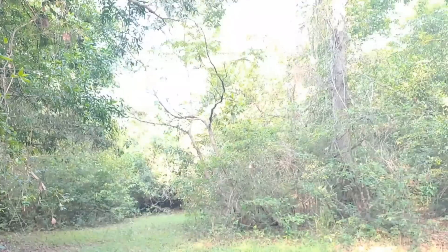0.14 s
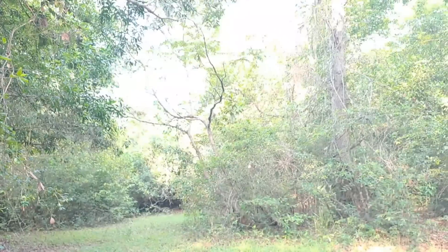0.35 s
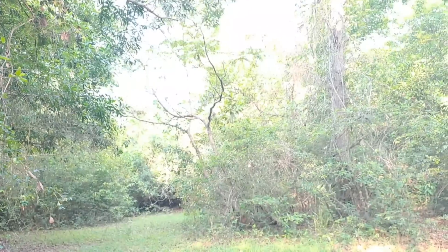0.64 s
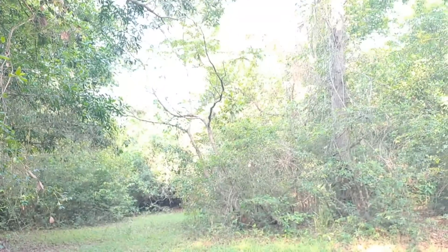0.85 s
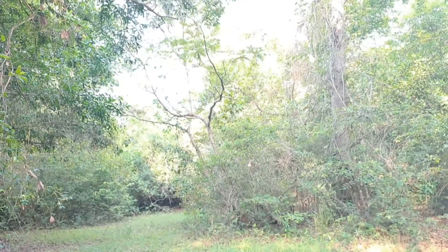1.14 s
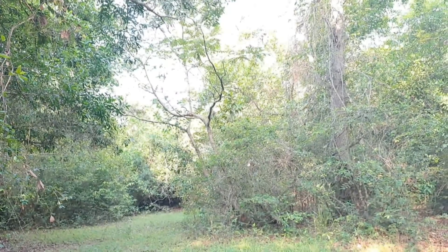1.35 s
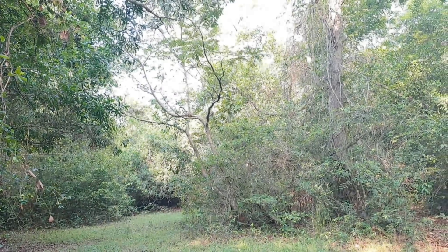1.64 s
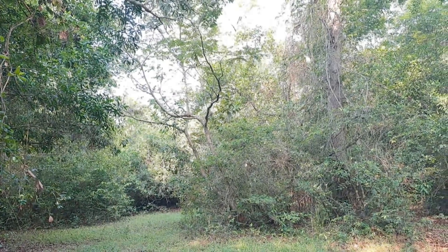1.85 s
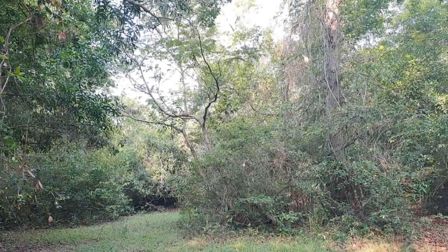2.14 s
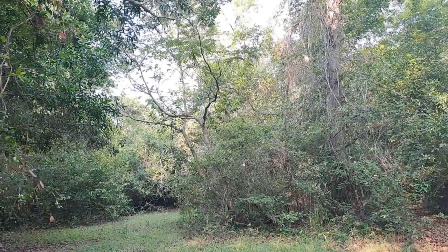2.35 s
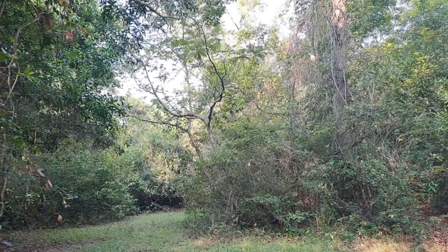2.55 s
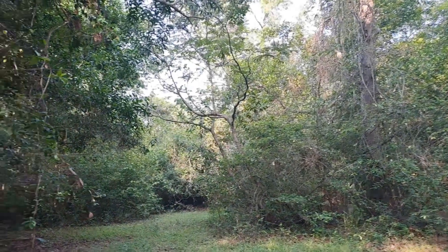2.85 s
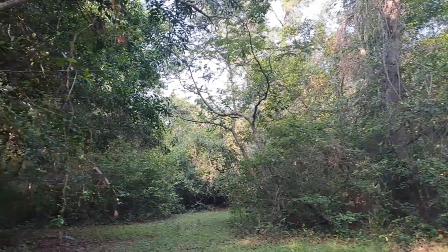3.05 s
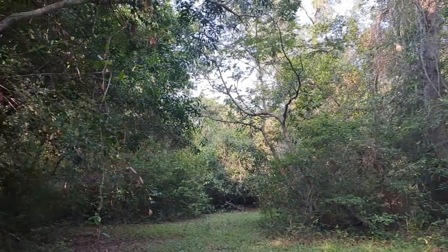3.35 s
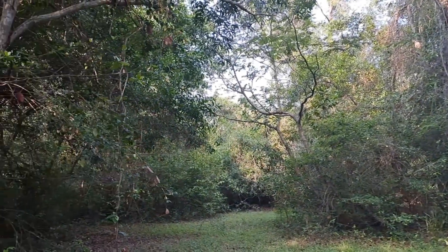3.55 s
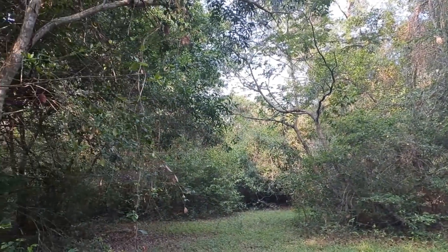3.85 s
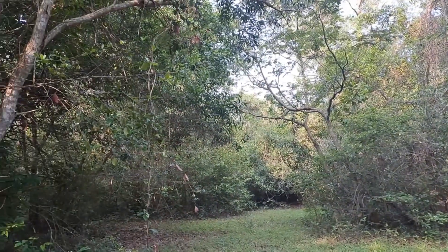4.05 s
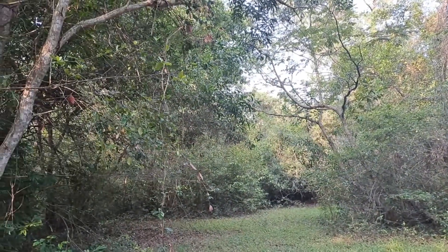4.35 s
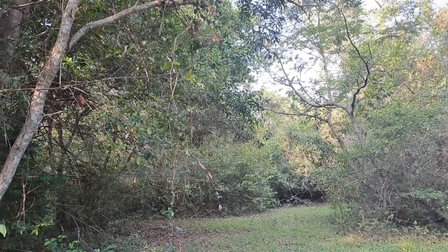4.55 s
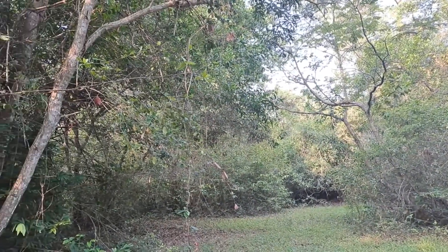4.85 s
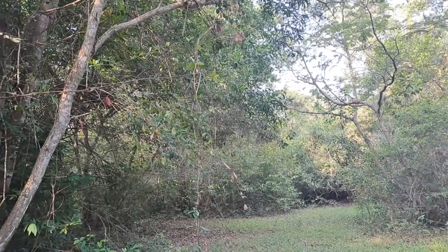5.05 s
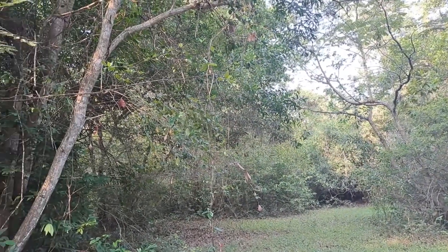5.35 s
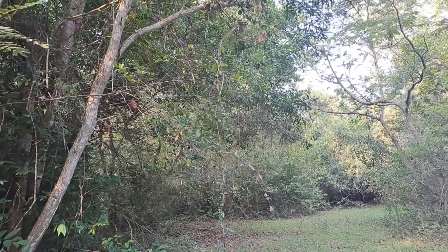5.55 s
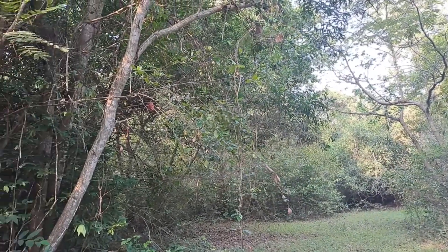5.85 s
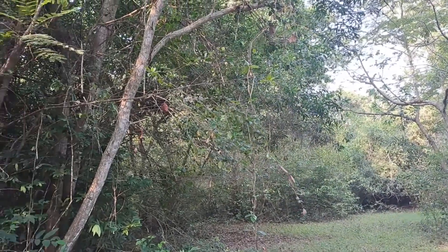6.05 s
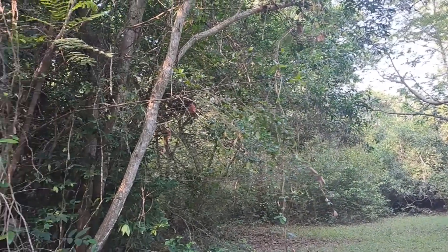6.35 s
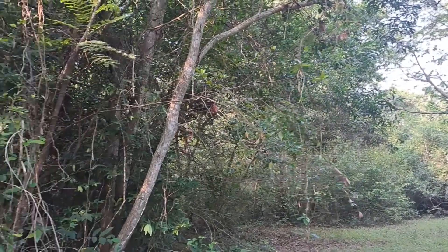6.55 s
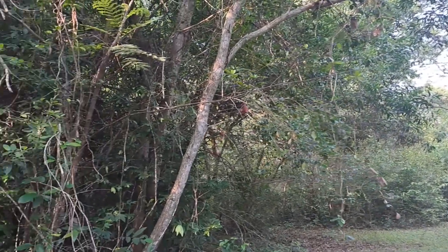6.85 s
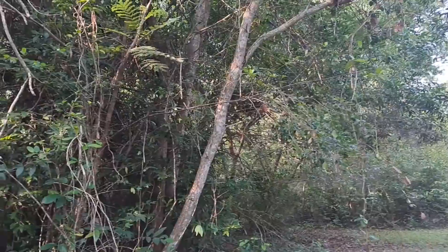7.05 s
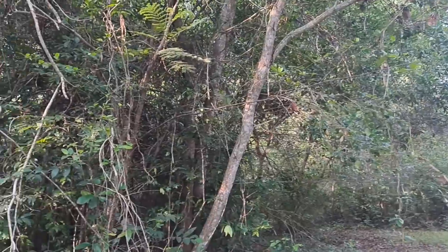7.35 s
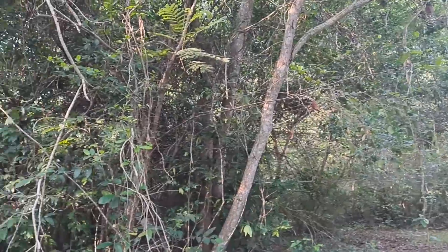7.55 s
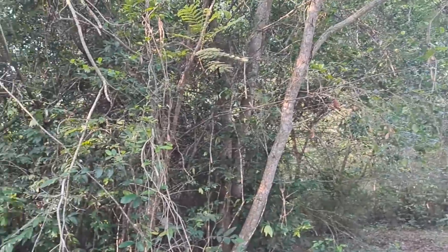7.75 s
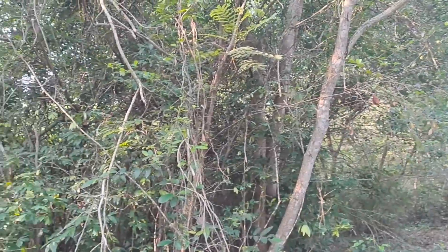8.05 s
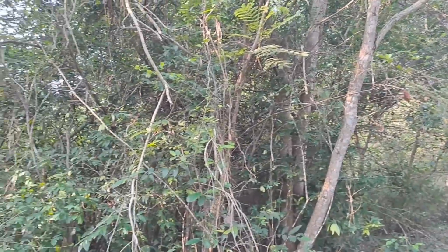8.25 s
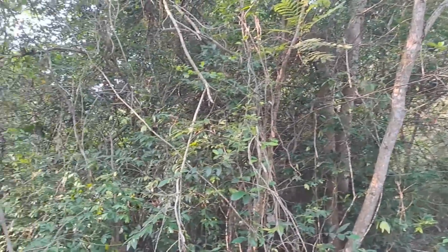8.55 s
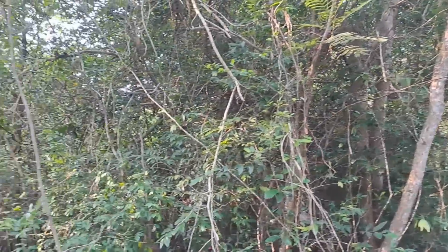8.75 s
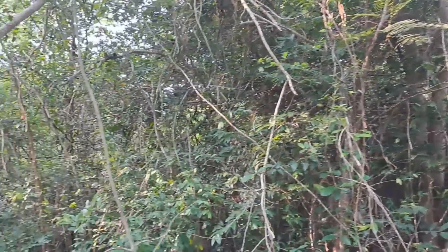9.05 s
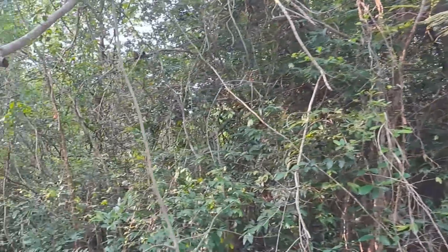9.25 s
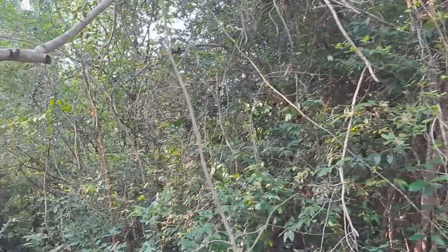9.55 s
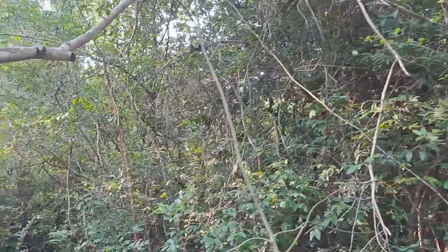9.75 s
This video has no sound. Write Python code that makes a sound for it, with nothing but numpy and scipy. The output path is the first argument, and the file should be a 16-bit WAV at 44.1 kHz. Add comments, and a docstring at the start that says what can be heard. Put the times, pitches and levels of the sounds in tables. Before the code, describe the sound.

A wren sings in bunches over a thin insect drone, with small birds chipping, a crow cawing and footsteps rustling through dry leaves.

```python
"""A wren sings a rolling phrase in bunches at a forest edge; a crow caws further off.
Small birds chip, twitter and whistle; crickets and katydids drone over a low distant rumble.
Someone turns on the spot, rustles and steps on dry leaves.
Trunks and foliage scatter every call before it reaches two microphone ports a hand apart."""
import sys
import numpy as np
from scipy import signal
from scipy.fft import rfft, irfft, next_fast_len
from scipy.io import wavfile
from scipy.ndimage import uniform_filter1d

SR = 44100
rng = np.random.default_rng(int(sys.argv[2]) if len(sys.argv) > 2 else 0)


def master_out(mix):
    """Clip the mix to full scale and print it as 16-bit PCM to the path in sys.argv[1]."""
    frames = np.transpose(np.atleast_2d(mix))
    ceiling = np.clip(frames, -1, 1)
    pcm = np.round(ceiling * 32767).astype(np.int16)
    wavfile.write(sys.argv[1], SR, pcm)


N = 436149
TIME = np.arange(N) / SR

# far chip, its sweep evened out by scatter: (time [s], pitch [ratio], level [dB])
FAR_CHIP_SWEEP = [(0, 1.09, -5), (.008, 1.02, 0), (.016, .97, 0), (.024, .92, -4)]


def undb(db):
    """Decibels to gain."""
    return 10 ** (np.asarray(db) / 20)


def unit(x):
    """Scale to rms 1."""
    return x / np.sqrt(np.mean(x ** 2))


def curve(rows, t=TIME):
    """Interpolate each further column along the first."""
    times, *columns = np.transpose(rows)
    return [np.interp(t, times, column) for column in columns]


def shape(x, gain):
    """Filter by gain(frequency in Hz)."""
    size = next_fast_len(N + 4096)
    hz = np.arange(size // 2 + 1) * SR / size + 1e-3
    return irfft(rfft(x, size) * gain(hz), size)[..., :N]


def colour(x, points):
    """Filter by (frequency [Hz], gain [dB]) points."""
    hz, db = np.transpose(points)
    return shape(x, lambda f: undb(np.interp(np.log(f), np.log(hz), db)))


def resonance(f, hz, width_hz):
    """Gain of a resonance passed twice."""
    return 1 / (1 + ((f * f - hz * hz) / (f * width_hz * 1.55)) ** 2)


def drift(rate_hz):
    """Smooth random signal, spread near 1."""
    knots = rng.standard_normal(int(N / SR * rate_hz) + 3)
    return 1.2 * np.interp(TIME * rate_hz, np.arange(len(knots)), knots)


def add(track, start_s, sound):
    """Mix a sound into a track, cropped at both ends."""
    start = int(start_s * SR)
    part = sound[max(-start, 0):max(N - start, 0)]
    track[max(start, 0):max(start, 0) + len(part)] += part


def swells(rows):
    """Envelope of smooth humps: (middle [s], length [s], level [dB])."""
    envelope = np.zeros(N)
    for middle_s, length_s, db in rows:
        add(envelope, middle_s - length_s / 2, undb(db) * signal.windows.hann(int(length_s * SR)))
    return envelope


def blows(rows):
    """Envelope of sudden contacts: (time [s], level [dB], decay [s])."""
    envelope, t = np.zeros(N), TIME[:SR // 2]
    for start_s, db, decay_s in rows:
        add(envelope, start_s, undb(db) * np.exp(-t / decay_s))
    return envelope


def ports(x, lag_ms, pan_db):
    """Two ports: the left is later by lag_ms and louder by pan_db."""
    late = shape(x, lambda f: np.exp(-2j * np.pi * f * lag_ms / 1000))
    return np.array([undb(pan_db / 2) * late, undb(-pan_db / 2) * x])


def forest(x, near_db, near_t60_s, far_db, far_t60_s):
    """Scatter off nearby trunks plus a wash from the depth of the wood."""
    t = TIME[:SR]
    response = 0
    for db, t60_s in ((near_db, near_t60_s), (far_db, far_t60_s)):
        echoes = rng.standard_normal((2, SR)) * (1 + 6 * (rng.random((2, SR)) < .01))
        echoes *= undb(-60 * t / t60_s) * (1 - np.exp(-t / .0021))
        response += undb(db) * echoes / np.linalg.norm(echoes, axis=1, keepdims=True)
    return signal.fftconvolve(x[None], response, axes=1)[:, :N]


def note(rows, waver=0):
    """Pure whistle along (time [s], pitch [Hz], level [dB]) points, never twice quite alike."""
    times, hz, db = np.transpose(rows)
    times = np.sort(times)
    t = np.arange(times[0], times[-1] + .001, 1 / SR)
    chance = rng.standard_normal(64)
    tremble = 1 + waver * np.interp(t - t[0], np.arange(64) / 120, chance)
    glide_hz = uniform_filter1d(np.interp(t, times, hz), 100) * tremble * (1 + .00715 * chance[0])
    envelope = undb(np.interp(t, times, db) + 1.2 * chance[1]) * signal.windows.tukey(len(t), .15)
    return np.sin(2 * np.pi * np.cumsum(glide_hz) / SR) * envelope


def wren():
    """A falling note, two arches and an upsweep; the direct path fades as the microphone turns away."""
    # phrases: (time [s], level [dB], direct path gain [dB])
    phrases = [(-.14, -23, 7.5), (0.1056, -24.5, 4.5), (.381, -24, 4.5), (.684, -24, 4.5),
               (1.6506, -24, 2.5), (1.925, -23.5, 2.5), (2.2088, -23.5, 3), (3.305, -25, 2.5),
               (3.5827, -24, 1.5), (3.8753, -25, 3), (5.7375, -25.5, -6), (6.009, -23, -3.5)]
    # four notes, each a list of (time in phrase [s], pitch [Hz], level [dB])
    notes = [
        [(-.002, 3650, -14.5), (.003, 3454, -1.5), (.008, 2890, -1), (.014, 2580, -25)],
        [(.04, 2183, -18.5), (.046, 2930, 0), (.052, 3185, -3), (.058, 2840, -10.5)],
        [(.083, 2067, -18), (.089, 2944, -1.5), (.095, 3274, 0), (.1, 2930, -21)],
        [(.125, 2022, -21), (.131, 2990, -3.5), (.141, 3570, -2.5), (.151, 3925, -2), (.161, 4073, 1),
         (.17, 4155, -11)],
    ]
    # soft lone calls on the falling note: (time [s], level [dB])
    lone_calls = [(7.304, -38), (7.578, -37.5)]
    # single echoes off trunks and the tree line: (delay [s], level [dB], left port lag [ms])
    trunks = [(.021, -18, -0.35), (.036, -13, 0.32), (.092, -18, -0.039)]
    song, direct = np.zeros((2, N))
    for start_s, db, direct_db in phrases:
        for rows in notes:
            onset_s = start_s + rows[0][0]
            sung = undb(db) * note(rows, waver=.0065)
            add(song, onset_s, sung)
            add(direct, onset_s, undb(direct_db) * sung)
    for start_s, db in lone_calls:
        call = undb(db) * note(notes[0])
        add(song, start_s, call)
        add(direct, start_s, call)
    # foliage shades some pitches and scatters them instead
    direct = colour(direct, [(2200, -1.5), (2800, -2.5), (3250, 3), (3700, -5), (4200, 1)])
    scattered = colour(song, [(2300, 2.7), (3000, -1.1), (3400, .52), (4100, .25)])
    echoes = forest(scattered, near_db=-.5, near_t60_s=.37, far_db=.5, far_t60_s=.66)
    for delay_s, db, lag_ms in trunks:
        delayed = np.pad(scattered, (int(delay_s * SR), 0))[:N]
        echoes += undb(db) * ports(delayed, lag_ms, pan_db=-15)
    return ports(direct, lag_ms=.38, pan_db=-1.5) + echoes


def crow():
    """Long harsh caws: uneven pulses of the syrinx through two throat resonances."""
    # caws: (start [s], length [s], level [dB], top pitch [Hz], added roughness [0-1])
    calls = [(-.44, .65, -28, 301.4, 0.18), (0.677, 0.67, -27.5, 289.4, 0.07),
             (8.783, .57, -37, 284.8, 0.22)]
    # double arch of a caw: (progress [0-1], pitch [ratio], level [dB], roughness [0-1])
    arches = [(0, .85, -11.5, .5), (.15, 0.94, -2.5, 0.42), (.26, 1, 2, 0.2), (.42, .93, -3, 0.27),
              (.64, .865, -2, 0.31), (.72, 1, -4, 0.48), (.92, .84, -6.5, 0.55), (1, .8, -16, 0.62)]
    # throat resonances: (centre [Hz], width [Hz], gain [dB])
    throat = [(1665, 326, 7), (2120, 135, 15)]
    contour, effort = [], np.zeros(N)
    for start_s, length_s, db, top_hz, added_rough in calls:
        for progress, ratio, _, rough in arches:
            contour.append((start_s + progress * length_s, top_hz * ratio, rough + added_rough))
        _, arch_db, _ = curve(arches, np.linspace(0, 1, int(length_s * SR)))
        add(effort, start_s, undb(db + arch_db))
    pitch_hz, rough = curve(contour)
    phase = 2 * np.pi * np.cumsum(pitch_hz * (1 + .0275 * rough * drift(220))) / SR
    pulses = sum(np.cos(k * phase) for k in range(3, 10)) * undb(5.8 * rough * drift(180))
    rasp = 3 * rough * (1 + np.cos(phase)) * rng.standard_normal(N)
    voice = shape(pulses + rasp,
                  lambda f: sum(undb(db) * resonance(f, hz, width_hz) for hz, width_hz, db in throat))
    timbre = [(500, -6), (850, 13.5), (1150, 8), (1450, 10.5), (2200, 0), (2600, 5), (4000, -28)]
    caws = unit(colour(voice, timbre)) * uniform_filter1d(effort, 900)
    wash = forest(caws, near_db=-2, near_t60_s=.74, far_db=-9, far_t60_s=.25)
    return ports(caws, lag_ms=.21, pan_db=0) + wash


def cricket(pitch_hz, stroke_hz, depth):
    """Wing tone pulsed by each stroke; paths through the grass shift its phase at each port."""
    strokes = 1 + depth * np.cos(2 * np.pi * np.cumsum(stroke_hz * (1 + .009 * drift(2.84))) / SR)
    phase = 2 * np.pi * np.cumsum(pitch_hz) / SR
    tone = np.array([np.sin(phase + 1.5 * drift(3) + .5 * drift(110)) for port in range(2)])
    return unit(tone * strokes) * undb([[1.4], [-1.4]])


def katydid(first_s=.17, period_s=.775, buzz_s=.76):
    """A high, narrow buzz repeated at an even pace."""
    envelope = np.zeros(N)
    for start_s in np.arange(first_s, N / SR, period_s):
        add(envelope, start_s, np.sqrt(signal.windows.hann(int(buzz_s * SR))))
    band = shape(rng.standard_normal((2, N)), lambda f: resonance(f, hz=11380, width_hz=370))
    return unit(band) * envelope * undb(-48.5)


def insects(trill_s=6.55):
    """Near crickets and a katydid; countless far insects merge into a hiss."""
    # near crickets: (pitch [Hz], wander [Hz], stroke rate [Hz], stroke depth [0-1], level [dB])
    crickets = [(8140, 12, 53, 1, -45), (8157, 25, 36, 0.4, -47), (7600, 17, 36, 0.58, -48),
                (8020, 16, 46, 1, -43), (8040, 94, 23, 0.3, -72), (7000, 100, 37, 0.8, -51),
                (8610, 7.3, 36, 1, -58.5)]
    # far chorus: (frequency [Hz], level [dB])
    chorus_spectrum = [(1000, -22), (2500, -7.5), (3500, -16.5), (4800, -2.5), (5400, -1.5), (6100, 3.5),
                       (6800, 8.5), (7700, 22.5), (8300, -12.5), (8850, -70), (9700, -13), (10600, 8.5),
                       (12000, -22), (16000, 0)]
    near = sum(cricket(hz + wander_hz * drift(1.5), stroke_hz, depth) * undb(db + 1.06 * drift(1.23))
               for hz, wander_hz, stroke_hz, depth, db in crickets)
    # one cricket trills once, its pitch rising as it warms up
    trill = cricket(7150 + 200 * (TIME - trill_s), stroke_hz=44, depth=.97)
    trill *= swells([(trill_s, .55, -41.5)])
    far_crickets = shape(rng.standard_normal((2, N)), lambda f: resonance(f, hz=8265, width_hz=147))
    buzz = katydid()
    chorus = unit(colour(rng.standard_normal((2, N)), chorus_spectrum)) * undb(-42 + .82 * drift(3.3))
    return near + trill + unit(far_crickets) * undb(-42) + buzz + chorus


def rumble():
    """Far traffic: long waves reach both ports alike, shorter ones apart."""
    # rumble and the hush of the wood: (frequency [Hz], level [dB])
    spectrum = [(20, -30), (32, -32), (43, -2), (55, 3.5), (68, -1.5), (90, -1), (130, -8.5), (185, -15),
                (250, -25.5), (400, -35.5), (700, -43.5), (1500, -51), (3000, -50.5)]
    # stereo width: (frequency [Hz], side to mid [dB])
    width = [(30, -34), (70, -15.5), (130, -15.5), (260, -7.5), (500, -5.5), (1000, 5), (2000, -2)]
    mid, side = colour(rng.standard_normal((2, N)), spectrum)
    side = colour(side, width)
    return unit(np.array([mid + side, mid - side])) * undb(-29.5)


def crackle(spread_db):
    """Dense tiny fractures of uneven size, different at each port."""
    sizes = undb(spread_db * rng.exponential(size=N // 48 + 1).clip(0, 4.5))
    return rng.standard_normal((2, N)) * np.repeat(sizes, 48)[:N]


def walker():
    """Clothes rustle, leaves crush and snap underfoot, dull scuffs arrive from the left."""
    # brushes of clothes and leaves; leaves under a shoe: (middle [s], length [s], level [dB])
    brushes = [(.02, 0.29, -39.5), (.95, 1, -44.5), (1.24, 0.14, -38), (1.63, 0.34, -36), (2.46, 0.27, -40),
               (3.12, 0.24, -50), (3.38, 0.37, -46), (3.59, 0.21, -36.5), (4.49, 0.33, -35),
               (5.11, 0.38, -43), (5.35, 0.24, -40), (6.08, 0.46, -45), (7.04, 0.23, -39.5),
               (7.38, 0.35, -49), (8.2, 0.5, -33.5), (8.48, 0.32, -31.5), (8.74, 0.38, -38),
               (9.05, 0.71, -45), (9.6, 0.73, -43), (9.8, 0.36, -33.5)]
    treads = [(8.18, 0.47, -31.5), (8.49, 0.44, -40.5), (8.8, 0.11, -44)]
    # twig and leaf snaps; close scuffs and knocks: (time [s], level [dB], decay [s])
    breaks = [(1.235, -46, .015), (2.079, -30, 0.011), (6.252, -36, 0.0074), (7.299, -37.5, 0.013),
              (8.049, -27, 0.0025), (8.119, -26, 0.0033), (8.478, -23.5, 0.053), (8.496, -14.5, 0.0022),
              (8.636, -25, 0.0022), (8.7395, -24.5, 0.0021), (8.999, -27, 0.0029), (9.632, -32, 0.026),
              (9.733, -17.5, 0.0046), (9.823, -27, 0.017)]
    knocks = [(1.62, -48, 0.071), (2.42, -50, .045), (3.33, -44.5, 0.034), (4.87, -40.5, 0.017),
              (5.33, -46, .064), (6.17, -46.5, 0.07), (6.23, -39, 0.04), (7.37, -50, 0.19),
              (8.472, -26, 0.0045), (9.632, -32, 0.036), (9.725, -34, 0.046), (9.775, -35, 0.036)]
    # spectra: (frequency [Hz], level [dB])
    rustle_spectrum = [(300, 6), (1000, -2.5), (2200, 0.5), (4000, 8), (6500, 11.5), (9500, 3.5),
                       (12500, 8), (16000, -2.5)]
    crush_spectrum = [(200, -1), (500, -1.5), (1100, 8.5), (2200, 2.5), (5500, -11), (9000, -4), (16000, 3)]
    snap_spectrum = [(200, 11), (700, 6), (1200, -12.5), (2500, 6), (5500, 0.5), (9000, 4), (12000, 11.5),
                     (16000, 3)]
    scuff_spectrum = [(120, -15), (250, 1), (480, 3), (720, 7.5), (1100, -5), (2000, -21), (5000, -47)]
    rustle = unit(colour(crackle(spread_db=2.5), rustle_spectrum)) * undb([[.8], [-.8]])
    faint_stir = undb(-49 + 2 * drift(6))
    rustle *= swells(brushes) + faint_stir
    crush = unit(colour(crackle(spread_db=2.5), crush_spectrum)) * swells(treads)
    snaps = unit(colour(crackle(spread_db=-2.5), snap_spectrum)) * blows(breaks)
    scuffs = unit(colour(crackle(spread_db=3)[0], scuff_spectrum)) * blows(knocks)
    return rustle + crush + snaps + ports(scuffs, lag_ms=-.31, pan_db=3)


def flock(count=190, centre_hz=6140, spread_hz=350):
    """Far birds chip at random, most of them faintly."""
    calls = np.zeros(N)
    for k, (when, size, pitch) in enumerate(rng.random((count, 3))):
        hz = centre_hz + spread_hz * (pitch - .5)
        chip = note(np.array(FAR_CHIP_SWEEP) * [1, hz, 1], waver=.0134)
        add(calls, (k + when) / count * N / SR, undb(-41.5 + 4.5 * size ** 2) * chip)
    return calls


def chips():
    """Thin falling chips: near ones arrive dry, far ones smeared, the flock as a shimmer."""
    # clearest chips: (time [s], level [dB], pitch [Hz], directness [0-1])
    calls = [(.03, -25.5, 6100, 0.86), (.575, -28, 6270, 0.7), (.815, -34, 6200, 0.66),
             (1.35, -28.5, 6170, .3), (1.433, -21.5, 6160, 0.86), (1.666, -27, 6100, .65),
             (2.64, -33, 6130, 0.5), (2.775, -30.5, 5270, 0.6), (3.629, -20, 6320, 0.8),
             (3.851, -32.5, 5520, 0.45), (4.18, -30, 5970, 0.6), (4.516, -31, 6650, .95),
             (4.891, -30.5, 5240, 0.1), (5.723, -19.5, 6260, .98), (6.18, -26, 6160, 0.6),
             (6.679, -29, 6300, 0.56), (6.943, -21, 6100, 0.9), (8.73, -30.5, 6270, 0.8),
             (9.125, -20.5, 6180, 0.95)]
    # near chip: (time [s], pitch [ratio], level [dB])
    near_sweep = [(0, 1.13, -10), (.005, 1.05, 1), (.012, .98, 3), (.022, .92, -4)]
    direct, scattered = np.zeros((2, N))
    for start_s, db, hz, directness in calls:
        near = note(np.array(near_sweep) * [1, hz, 1])
        far = note(np.array(FAR_CHIP_SWEEP) * [1, hz, 1], waver=.015)
        add(direct, start_s, directness * undb(db) * near)
        add(scattered, start_s, (1 - .85 * directness) * undb(db) * far)
    wash = forest(scattered + flock(), near_db=0, near_t60_s=.25, far_db=-2, far_t60_s=.6)
    return undb(-3.5) * ports(direct, lag_ms=-.13, pan_db=3) + wash


def twitters(period_s=.028, rise_db_per_s=69):
    """Runs of quick falling notes that grow louder through each run."""
    # runs: (start [s], length [s], last note's gain [dB])
    runs = [(0.978, .04, -42.5), (1.257, .04, -40), (5.046, .07, -41.5), (5.319, .1, -40.5),
            (5.591, .125, -38.5), (5.858, .1, -35.5), (6.1, .04, -37.5)]
    # one note: (time [s], pitch [Hz], level [dB])
    twit = [(0, 4485, 7), (.006, 4113, 10), (.012, 3970, 9), (.019, 3650, -14)]
    song = np.zeros(N)
    for start_s, length_s, last_db in runs:
        offsets_s = np.arange(0, length_s, period_s)
        for offset_s in offsets_s:
            db = last_db - rise_db_per_s * (offsets_s[-1] - offset_s)
            add(song, start_s + offset_s, undb(db) * note(twit))
    wash = forest(song, near_db=-1, near_t60_s=.35, far_db=-16.5, far_t60_s=.99)
    return ports(song, lag_ms=-.754, pan_db=2) + wash


def whistles(slur_from_hz=3720, slur_to_hz=2920, run_s=9.287, run_period_s=.061):
    """Far slurs and a run of falling notes: a thin clean path and a hoarse scatter off the leaves."""
    # one bird's repeated downward slur: (time [s], level [dB], length [s])
    slurs = [(1.109, -37.5, 0.19), (1.674, -35.5, 0.17), (4.126, -37, 0.23), (4.665, -37.5, .21),
             (7.815, -40, 0.2), (9.699, -32.5, 0.08)]
    # other whistles: (time [s], level [dB], length [s], first pitch [Hz], last pitch [Hz])
    others = [(2.546, -52, 0.16, 2550, 2510), (3.233, -46, 0.11, 3440, 4050),
              (4.456, -44.5, 0.067, 2330, 1910), (6.504, -50.5, 0.11, 3360, 3740),
              (9.579, -40, 0.12, 3400, 3770)]
    # course of a whistle: (progress [0-1], glide [0-1], level [dB])
    course = [(0, 0, 3), (.3, .1, -1.5), (0.549, 0.17, 3.5), (0.802, .62, 1.5), (1, 1, 4.5)]
    progress, glide, swell_db = np.transpose(course)
    repeated = [(*slur, slur_from_hz, slur_to_hz) for slur in slurs]
    song = np.zeros(N)
    for start_s, db, length_s, first_hz, last_hz in repeated + others:
        hz = first_hz + glide * (last_hz - first_hz)
        rows = np.transpose([progress * length_s, hz, db + swell_db])
        add(song, start_s, note(rows, waver=.012))
    for k in range(5):
        add(song, run_s + k * run_period_s, note([(0, 4450, -44), (.033, 3350, -44)]))
    hoarse = song * (.5 + .7 * drift(650))
    wash = forest(hoarse, near_db=-1.5, near_t60_s=.32, far_db=2.5, far_t60_s=1)
    return undb(-7.5) * ports(song, lag_ms=-.3, pan_db=2) + wash


def twig(start_s=8.4718, knock_hz=250):
    """A dry twig breaks: a sharp crack and a short knock of the wood."""
    t, snap = TIME[:SR // 20], np.zeros(N)
    crack = undb(-8.5) * rng.standard_normal(len(t)) * np.exp(-t / .0013)
    knock = undb(-25) * np.sin(2 * np.pi * knock_hz * t) * np.exp(-t / .01)
    add(snap, start_s, crack + knock)
    return ports(snap, lag_ms=-.4, pan_db=2)


def scene():
    """Everything at the forest edge."""
    birds = wren() + twitters() + chips() + whistles() + crow()
    return birds + insects() + walker() + twig() + rumble()


def record(dry):
    """Steep low-pass at 16 kHz."""
    return signal.sosfilt(signal.ellip(10, .2, 80, 16000, fs=SR, output="sos"), dry)


dry = scene()
out = record(dry)
master_out(out)
```